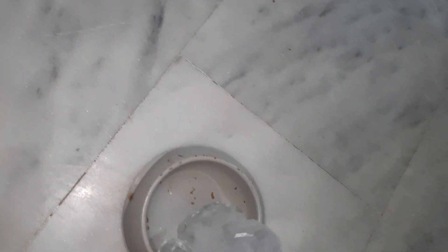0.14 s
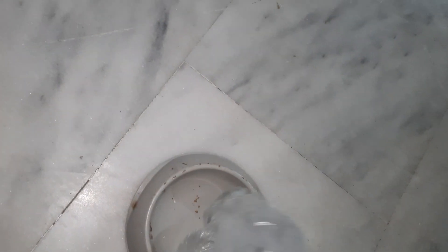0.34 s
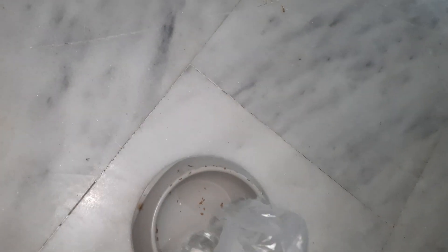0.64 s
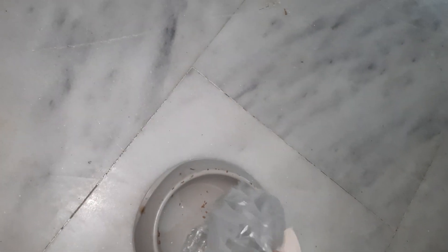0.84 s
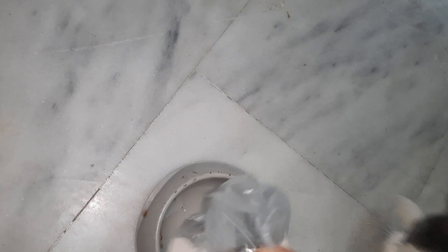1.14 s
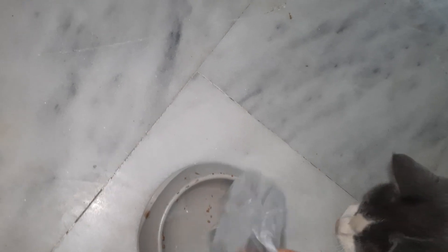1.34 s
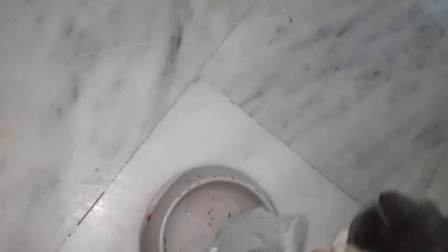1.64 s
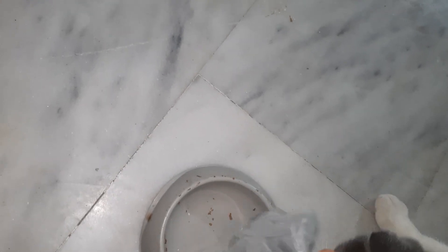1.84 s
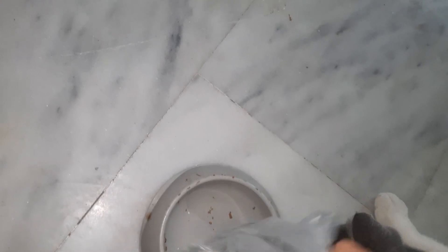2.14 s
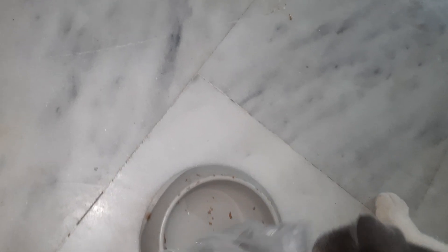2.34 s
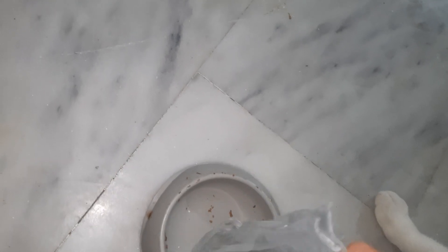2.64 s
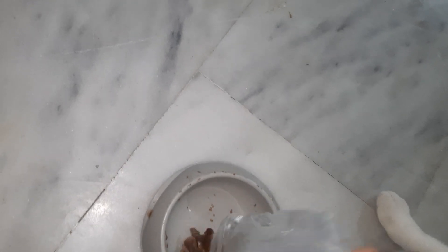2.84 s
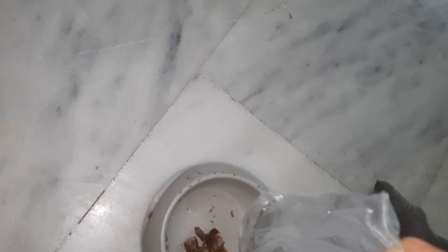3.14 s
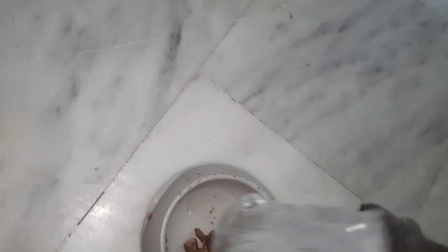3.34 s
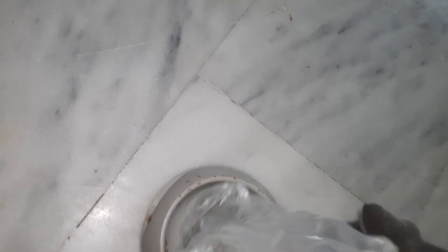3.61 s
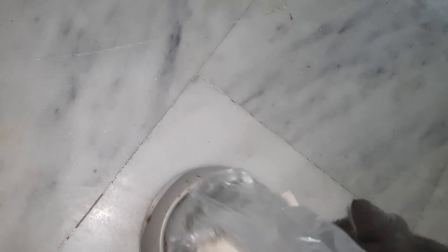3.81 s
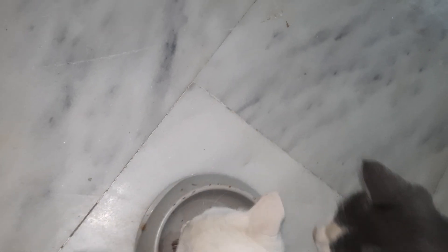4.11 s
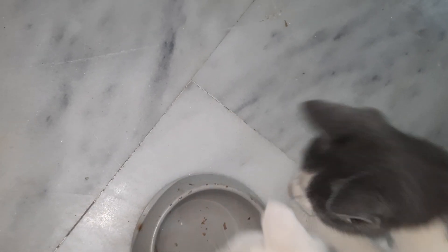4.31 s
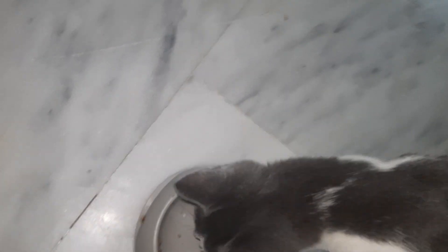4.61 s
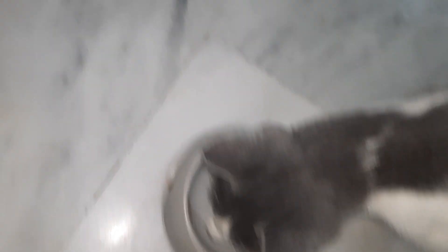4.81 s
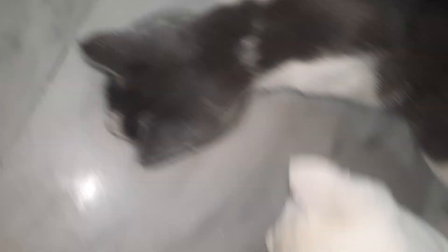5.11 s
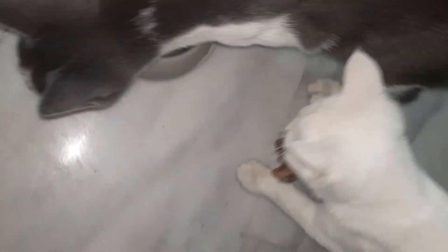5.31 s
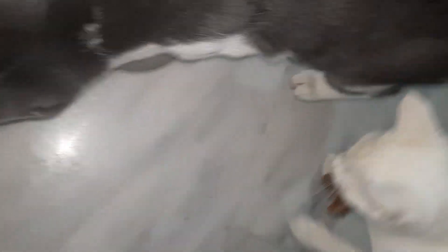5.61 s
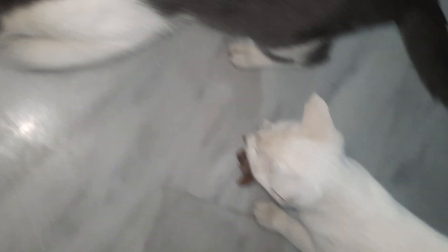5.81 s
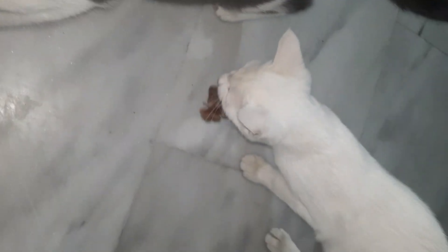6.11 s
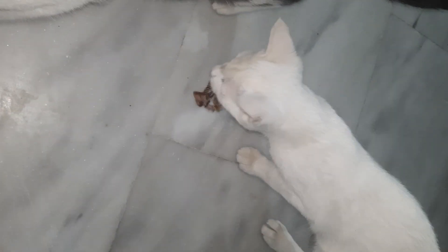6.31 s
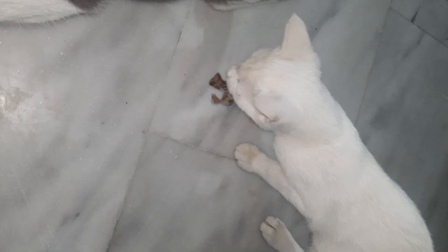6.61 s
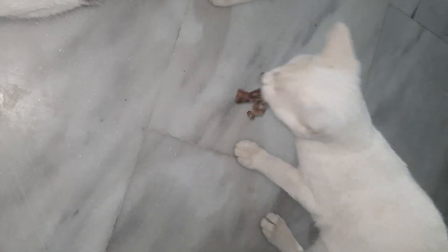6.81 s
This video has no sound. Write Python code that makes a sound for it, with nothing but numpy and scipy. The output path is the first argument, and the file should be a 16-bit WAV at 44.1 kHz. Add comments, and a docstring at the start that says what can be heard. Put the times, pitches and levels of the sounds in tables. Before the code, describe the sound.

Close crackling of a plastic bag and two bowl knocks, followed by a cat's low, continuous growl with faint wet bites.

```python
"""A cat growls over its food

A thin plastic bag is shaken out close by, over a food bowl on a stone floor: its creases crackle,
the sheet flaps and the bowl knocks. A cat snatches a piece and growls over it in one long low rattle,
its vocal folds thumping the throat and puffing air through the mouth. It chews as it growls,
while the bag is crumpled away to the left."""
import sys
import numpy as np
from scipy import signal
from scipy.fft import rfft, irfft
from scipy.io import wavfile
from scipy.ndimage import uniform_filter1d

SR = 44100
rng = np.random.default_rng(int(sys.argv[2]) if len(sys.argv) > 2 else 0)


def master(y):
    """Save y as 16-bit WAV."""
    cut = np.clip(np.atleast_2d(y).T, -1, 1)
    pcm = np.round(cut * 32767)  # scale
    wavfile.write(sys.argv[1], SR, pcm.astype(np.int16))


N = 306495
TIME = np.arange(N) / SR

# how hard the cat growls: t/s, level/dB
EFFORT = [(4.15, -54.5), (4.24, -41.5), (4.42, -43), (4.53, -41.5), (4.73, -40), (4.8, -38), (5.1, -38),
          (5.16, -39.5), (5.33, -35.5), (5.57, -37.5), (5.77, -38.5), (5.86, -42.5), (6.07, -40.5),
          (6.28, -45.5), (6.47, -43.5), (6.68, -40.5), (6.95, -47)]
# tone of the throat with the mouth nearly shut: f/Hz, level/dB
THROAT_TONE = [(30, -62), (65, -6), (105, 1), (140, 6), (205, 7.5), (285, 8.5), (345, 11), (400, -6),
               (490, -1.5), (570, -7), (780, -17), (950, -50), (3000, -72)]
# the mouth's lowest resonance: t/s, f/Hz, level/dB relative to the effort
MOUTH_RING = [(4.25, 650, -8), (4.4, 574, -12.5), (4.6, 616, -16), (5.05, 660, -22), (5.35, 640, -16),
              (5.68, 610, -19), (5.76, 550, -19.5), (5.85, 600, -23), (6.06, 660, -16), (6.45, 593, -18),
              (6.68, 626, -13), (6.9, 600, -20.5)]
# rasping resonances above it: f/Hz, width/Hz, level/dB
RASP_RINGS = [(1050, 225, 10.5), (1487, 160, 6.5)]
# how much rasp is in the growl: t/s, level/dB
SNARL = [(4.16, -2), (4.32, -42), (5.05, -46), (5.4, -36), (5.76, -33), (5.86, -20), (6.12, -19),
         (6.3, -16), (6.6, -26.5), (6.85, -17)]

def growl(puff_s=0.0076, mouth_width_hz=220, jaw_rest_hz=630, press_above_db=-43.5):
    """Each beat of the vocal folds thumps the throat and lets a puff of air through the mouth."""
    gape, clench = chewing()
    closures, beats = vocal_folds(gape + clench)
    (effort_db,), (mouth_hz, mouth_db), (rasp_db,) = curves(EFFORT), curves(MOUTH_RING), curves(SNARL)
    # an open jaw trades the low resonance for higher, louder rasp; a clench muffles everything
    effort_db = effort_db - clench
    mouth_db = mouth_db - gape - 30 * clench
    rasp_db = rasp_db - 2 + 5 * gape - 5.5 * clench
    jaw = (mouth_hz / jaw_rest_hz) ** 0.35 + 0.086 * gape
    airflow = evened(signal.lfilter([1], [1, -np.exp(-1 / (puff_s * SR))], beats))
    puffs = evened((airflow + 0.41) * rng.standard_normal(N))
    thumps = -evened(closures)  # each closure is a drop in pressure
    throat = colour(thumps + .2 * puffs, THROAT_TONE)
    # harder effort lifts the upper edge of the throat's tone
    press = gain_of(1.56 * (effort_db - press_above_db)) - 1
    chest = steadied(throat + press * resonate(throat, hz=482, width_hz=83))
    mouth = steadied(resonate_twice(thumps + .5 * puffs, mouth_hz, mouth_width_hz)) * gain_of(mouth_db)
    breath = .5 * thumps + puffs
    rings = sum(gain_of(db) * resonate_twice(breath, hz * jaw, width) for hz, width, db in RASP_RINGS)
    rasp = steadied(rings) * gain_of(rasp_db)
    fade_in = np.clip((TIME - EFFORT[0][0]) / 0.018, 0, 1)
    return (gain_of(effort_db) * (chest - mouth + rasp) + teeth(puffs)) * fade_in


# how fast the vocal folds beat: t/s, f/Hz
GROWL_PITCH = [(4.15, 147), (4.35, 131.5), (4.53, 140), (4.65, 132.5), (4.74, 137.5), (4.8, 147.5),
               (4.97, 142), (5.06, 145), (5.15, 138.5), (5.32, 147.5), (5.57, 144), (5.67, 148.5),
               (5.78, 146), (5.87, 137), (6.04, 144), (6.24, 136), (6.47, 133.5), (6.55, 142),
               (6.68, 147.5), (6.95, 134)]
# unevenness of the beats: t/s, roughness/0-1, flutter's lag behind half the beat rate/Hz, flutter depth
ROUGHNESS = [(4.15, .6, 0, .9), (4.3, .3, 0, 1.05), (4.72, .35, 1, 1.1), (4.8, .55, 6, .6),
             (5.75, .7, 9, .6), (5.92, .75, 11, .85), (6.42, .7, 3, .9), (6.62, .75, 10, .7)]

def vocal_folds(chew, jitter_s=.00034, shimmer_db=1.7, tremble=.024):
    """The folds beat unevenly under a slower flutter; returns their closures and each beat's strength."""
    (hz,), (rough, lag_hz, depth) = curves(GROWL_PITCH), curves(ROUGHNESS)
    rough = rough + 0.2 * chew
    tremor = wobble(hz=13, width_hz=9)
    stray, swell = wobble(hz=18, width_hz=18), wobble(hz=18, width_hz=18)
    cycles = np.cumsum(hz * (1 + tremble * rough * tremor)) / SR
    due = np.flatnonzero(np.diff(np.floor(cycles)))  # one beat per cycle
    early, strong = (rng.standard_normal((N, 2))[:len(due)] * rough[due, None]).T
    beat_at = np.clip((due - SR * jitter_s * early).astype(int), 0, N - 1)
    beats = np.zeros(N)
    beats[beat_at] = gain_of(shimmer_db * strong)
    # the flutter swells and hurries the beats, adding a tone above each harmonic
    unsteady = .6 * rough * uniform_filter1d(.5 * swell + 1j * stray, size=300)
    flutter_cycles = cycles / 2 - np.cumsum(lag_hz) / SR
    flutter = 1 + depth * np.exp(2j * np.pi * flutter_cycles + unsteady)
    return (signal.hilbert(beats) * flutter).real, beats * abs(flutter)


# air past the teeth: t/s, lower resonance f/Hz, lower level/dB, upper level/dB
TEETH_HISS = [(4.25, 2580, -71, -84), (5.1, 2630, -68.5, -85), (5.17, 1560, -82, -84),
              (5.39, 1600, -63.5, -77), (5.8, 1570, -80, -88), (5.89, 1710, -83, -71),
              (5.97, 1620, -72, -89), (6.1, 1800, -71, -73), (6.15, 2380, -70, -73),
              (6.205, 2590, -75, -65), (6.31, 2190, -82, -89), (6.42, 2320, -69, -63.5),
              (6.49, 2220, -81, -77), (6.57, 1620, -72.5, -79), (6.72, 1590, -73, -74),
              (6.83, 2220, -91, -73), (6.93, 2430, -70.5, -78)]

def teeth(puffs, whistle_hz=6250, rest_hz=2330):
    """Air and spittle ring two narrow resonances behind the teeth; the upper sinks as the lower rises."""
    low_hz, low_db, high_db = curves(TEETH_HISS)
    high_hz = whistle_hz - 1.3 * (low_hz - rest_hz)
    low = steadied(resonate_twice(puffs, low_hz, width_hz=340))
    spittle = crackle(per_s=1200, spread_db=3) * np.sqrt(abs(puffs))
    high = steadied(resonate_twice(spittle, high_hz, width_hz=560))
    return low * gain_of(low_db) + high * gain_of(high_db)


# chews: widest opening t/s, half length/s, opening/0-1, clench/0-1
JAW_MOVES = [(5.9, 0.047, 0.5, 0.5), (6.154, 0.083, 0.8, 0.94), (6.413, 0.064, 1, 0.3),
             (6.93, 0.03, 0.45, 0.49)]

def chewing(lag=1.35):
    """The jaw gapes, then clenches `lag` half lengths later; returns both moves as curves."""
    gape = sum(wide * np.exp(-((TIME - s) / half) ** 2) for s, half, wide, _ in JAW_MOVES)
    clench = sum(hard * np.exp(-(2 * ((TIME - s) / half - lag)) ** 2) for s, half, _, hard in JAW_MOVES)
    return gape, clench


# bites: t/s, level/dB, length/s, ring of the mouth f/Hz, splash level/dB relative to the ring
WET_BITES = [(4.498, -52, 0.015, 2770, 7), (5.905, -49.5, 0.0081, 5750, 2.5),
             (5.932, -58, 0.0064, 4000, 6.5), (6.144, -50, 0.008, 1493, -15),
             (6.202, -58, 0.017, 2540, 12.5), (6.91, -54.5, 0.019, 1490, -1)]
# tone of the wet splash: f/Hz, level/dB
SPLASH_TONE = [(400, -34), (1000, -3), (1500, 5), (2100, -8), (2700, 2), (3400, -9), (5000, -7),
               (6000, -0.5), (10000, -15)]

def bites(level_db=-5):
    """Each bite is a short cluster of wet crackles that rings the mouth at its own pitch."""
    t, out = np.arange(SR // 8) / SR, np.zeros(N)
    for s, db, length, hz, splash_db in WET_BITES:
        clicks = crackle(per_s=5500, spread_db=4)[:len(t)]
        ring = steadied(resonate_twice(clicks, hz, width_hz=600), size=300)
        splash = gain_of(splash_db) * steadied(colour(clicks, SPLASH_TONE), size=300)
        shape = np.exp(-t / length) * (1 - np.exp(-12 * t / length))
        add(out, s - .001, gain_of(db + level_db) * shape * (ring + splash))
    return out


def saliva(level_db=-74):
    """Tiny wet ticks as the lips part, with the same bright tone as the bag's creases."""
    clicks = np.diff(crackle(per_s=130, spread_db=3), prepend=0)
    gape, _ = chewing()
    return gain_of(level_db) * evened(colour(clicks, CREASE_TONE)) * np.sqrt(gape)


# how far left the cat sounds: f/Hz, left minus right/dB
CAT_PAN = [(290, 9.5), (350, 11.5), (440, 17), (495, 10), (535, -6), (600, 0), (710, 2), (800, 9),
           (1150, 14), (2400, 7.5), (8000, 9)]
# how far the right channel runs ahead: f/Hz, phase/radians
RIGHT_LEAD = [(360, .2), (450, 1.3), (520, 2.8), (550, .2)]

def cat():
    """Growl and chewing come from the left."""
    hz = np.fft.rfftfreq(N, 1 / SR)
    lead = np.exp(1j * np.outer([0, 1], value_at(RIGHT_LEAD, hz)))
    voice = growl() + bites() + saliva()
    return irfft(rfft(voice) * pan(value_at(CAT_PAN, hz)) * lead, N)


# the bag gripped and crumpled: t/s, length/s, crinkle level/dB, flap offset/dB
BAG_CRUMPLES = [(-.02, 0.28, -55.5, -10), (0.31, 0.17, -63, -11), (0.523, 0.42, -60, -6.5),
                (0.989, 0.097, -61, -11.5), (1.11, 0.33, -53.5, -8.5), (1.452, 1.48, -56.5, -8),
                (2.963, 0.16, -71.5, -5.5), (3.188, 0.33, -64, -9), (3.5, 0.12, -62, -10),
                (3.747, 0.22, -52, -11), (3.98, 0.53, -60.5, -1.5), (4.405, 0.44, -53.5, -12.5),
                (4.904, 0.091, -60.5, -12), (5.021, 0.45, -58.5, -2.5), (5.475, 0.32, -64.5, -9.5),
                (5.82, 0.16, -70, 3), (6.064, 0.14, -70, -15), (6.61, 0.081, -65.5, -20)]
# shakes and tugs: t/s, crinkle level/dB, half length/s, flap offset/dB
BAG_SHAKES = [(0.728, -57.5, 0.032, -14), (0.903, -58.5, 0.023, -7.5), (1.563, -51, 0.036, -10),
              (1.73, -51.5, 0.02, -11), (1.918, -50, 0.032, -16), (2.074, -50, 0.025, -11),
              (2.245, -48, 0.027, -12.5), (2.41, -44.5, 0.019, -16), (2.593, -45.5, 0.025, -13.5),
              (2.778, -44.5, 0.024, -12), (4.21, -47.5, 0.075, -14.5), (4.773, -50, 0.018, -16),
              (5.075, -44.5, 0.032, -35), (5.428, -52, 0.039, -13)]

def handling(grip_s=0.027, relax_s=0.041, firm_db=-45, flap_above_db=-54.5):
    """Crumples hold steady, shakes swell and fade; returns how strongly the bag crinkles and flaps."""
    moves = []
    for s, length, db, flap_db in BAG_CRUMPLES:
        slow = gain_of(0.15 * (firm_db - db))  # gentler crumples start and end more slowly
        grip = np.clip((TIME - s) / (grip_s * slow), 0, 1)
        relax = np.exp(-np.maximum(TIME - s - length, 0) / (relax_s * slow))
        moves.append((gain_of(db) * grip * relax, flap_db))
    for s, db, half, flap_db in BAG_SHAKES:
        moves.append((gain_of(db) / np.sqrt(1 + ((TIME - s) / half) ** 4), flap_db))
    crinkle = np.sqrt(sum(move ** 2 for move, _ in moves))
    flap = np.sqrt(sum((move * gain_of(flap_db)) ** 2 for move, flap_db in moves))
    return crinkle, flap * (crinkle / gain_of(flap_above_db)) ** 0.61


def plastic(tone, per_s, spread_db, clump_db):
    """Creases buckle in clumps; their clicks reach left and right by different scattered paths."""
    clumps = gain_of(clump_db * evened(uniform_filter1d(rng.standard_normal(N), 330)))
    out = np.zeros((2, N))
    for _ in range(6):
        paths = rng.standard_normal((2, 256)) * np.exp(-np.arange(256) / SR / 0.0012)
        clicks = crackle(per_s / 6, spread_db) * clumps
        out += signal.oaconvolve(clicks[None], evened(paths), axes=1)[:, :N]
    return np.array([steadied(colour(side, tone)) for side in refolded(out)])


def refolded(x, depth_db=2.2):
    """As the bag's folds change shape, patches of its tone swell and fade."""
    spectrum = signal.stft(x, nperseg=256)[2]
    patches = rng.standard_normal(spectrum.shape[1:])
    for _ in range(2):
        patches = uniform_filter1d(uniform_filter1d(patches, size=7, axis=0), size=16, axis=1)
    return signal.istft(spectrum * gain_of(depth_db * evened(patches)), nperseg=256)[1][:, :N]


# tones of the fine creases and of the flapping sheet: f/Hz, level/dB
CREASE_TONE = [(1500, -26.5), (3000, -17), (3900, -4), (4700, -6.5), (5800, 0), (7000, 1), (8500, -1.5),
               (9500, -7.5), (10600, -4.5), (12000, 1), (13300, 2), (14400, 1.5), (15800, -4.5)]
SHEET_TONE = [(100, -38), (320, 0), (500, -15.5), (800, -2), (1250, -1.5), (1600, 4.5), (2100, -3),
              (2750, 0), (4100, -1.5), (7000, -7.5), (15000, -35)]
# how the bag's tone differs between the sides: f/Hz, left minus right/dB
BAG_PAN = [(450, 4.5), (1100, 16.5), (3300, -1), (5500, 5), (8500, -1), (13000, -3)]
# the bag's move to the left: t/s, left minus right/dB
BAG_PATH = [(0, 2.5), (2.8, 3.5), (3.7, 2.5), (4.5, 6.5), (6.95, 17)]

def bag(level_db=2):
    """The creases crinkle finely; the whole sheet flaps more as it is shaken harder."""
    crinkle, flap = handling()
    creases = crinkle * plastic(CREASE_TONE, per_s=5000, spread_db=2.5, clump_db=1.5)
    sheet = flap * plastic(SHEET_TONE, per_s=4000, spread_db=1.5, clump_db=1.1)
    sides = pan(value_at(BAG_PAN, np.fft.rfftfreq(N, 1 / SR)))
    rustle = irfft(rfft(creases + sheet) * sides, N)
    return gain_of(level_db) * rustle * pan(curves(BAG_PATH)[0])


# single creases snapping: t/s, level/dB
CREASE_SNAPS = [(0.1082, -30.5), (1.975, -38), (2.4014, -34), (2.7487, -33), (2.7954, -30), (3.481, -34.5),
                (3.4955, -38), (3.9364, -36)]

def snaps(level_db=1.5):
    """A stiff crease flips over with one sharp, bright tick and a brief shiver."""
    t, out = np.arange(600) / SR, np.zeros((2, N))
    for s, db in CREASE_SNAPS:
        for side in out:
            flip = (t == 0) + .25 * rng.standard_normal(len(t)) * np.exp(-t / .001)
            tick = colour(np.diff(flip, prepend=0), CREASE_TONE)
            add(side, s, gain_of(db + level_db) * tick / abs(tick).max())
    return out * pan(left_db=2)


# food and bowl knocking: t/s, level/dB
BOWL_KNOCKS = [(2.78, -39.5), (2.792, -47), (4.116, -40.5), (4.124, -53)]
# the notes the bowl rings at: f/Hz, level/dB, time to fade by 60 dB/s
BOWL_NOTES = [(660, -6.5, 0.081), (860, 7.5, 0.044), (994, 8, 0.054), (1290, 4, 0.042), (1530, 11.5, 0.03),
              (1720, 9.5, 0.028)]

def bowl(attack_s=0.00098):
    """The bowl knocks on the stone with a short, dead ring."""
    t, out = np.arange(SR // 8) / SR, np.zeros(N)
    for s, db in BOWL_KNOCKS:
        ring = sum(gain_of(note_db - 60 * t / fade_s) * np.sin(2 * np.pi * (hz * t + rng.random()))
                   for hz, note_db, fade_s in BOWL_NOTES)
        add(out, s, gain_of(db) * np.minimum(t / attack_s, 1) * ring / np.std(ring[:132]))
    return out * pan(left_db=7)


# how long the room rings: f/Hz, time to fade by 60 dB/s
ECHO_FADE = [(150, 0.83), (1000, 0.16), (5000, 0.0081), (15000, 0.0077)]

def room(x):
    """Bare walls add a short echo whose treble dies first."""
    hz, t, noise = signal.stft(rng.standard_normal((2, SR // 2)), SR, nperseg=256)
    fade = gain_of(-60 * t / value_at(ECHO_FADE, hz)[:, None]) * (t > .006)
    tail = signal.istft(noise * fade, SR, nperseg=256)[1]
    return signal.fftconvolve(x.mean(0)[None], tail / np.linalg.norm(tail[0]), axes=1)[:, :N]


# tones of the quiet room and of the rumble: f/Hz, level/dB
AIR_TONE = [(25, -51), (43, -26), (113, 0.5), (152, -4.5), (313, -12.5), (2120, -23.5), (13500, -23),
            (15500, -63)]
RUMBLE_TONE = [(20, -37), (45, -8), (65, -3.5), (110, -12.5), (200, -18), (400, -19.5), (1000, -46.5)]
# how loud the rumble is: t/s, level/dB
RUMBLE_LEVEL = [(0, -77.5), (2.7, -71.5), (3.1, -75), (3.9, -74.5), (4.3, -67), (6.1, -63.5), (6.37, -60.5),
                (6.55, -60)]

def background(air_db=-73.5, stereo_width=0.23):
    """Still room air and a low rumble of movement."""
    air = np.array([evened(colour(noise, AIR_TONE)) for noise in rng.standard_normal((2, N))])
    left, right, both = (evened(colour(noise, RUMBLE_TONE)) for noise in rng.standard_normal((3, N)))
    rumble = evened(both + stereo_width * np.array([left, right])) * gain_of(curves(RUMBLE_LEVEL)[0])
    return gain_of(air_db) * air * pan(left_db=1.6) + rumble * pan(left_db=7.8)


def gain_of(db):
    """Turns decibels into a multiplier."""
    return 10 ** (np.asarray(db) / 20)


def evened(x):
    """Brings the overall level to 1."""
    return x / np.sqrt(np.mean(x ** 2) + 1e-20)


def steadied(x, size=2600):
    """Brings the running level to 1 and keeps the fast detail."""
    return x / np.sqrt(abs(uniform_filter1d(uniform_filter1d(x ** 2, size), size)) + 1e-12)


def value_at(points, hz):
    """Looks up a table by frequency, sliding between its rows."""
    f, value = np.transpose(points)
    return np.interp(np.log(hz + 1), np.log(f + 1), value)


def curves(rows):
    """Turns a table that starts with times into one curve for each other column."""
    s, *columns = np.transpose(rows)
    return [np.interp(TIME, s, column) for column in columns]


def add(mix, s, sound):
    """Mixes a sound in at s seconds."""
    part = mix[max(round(s * SR), 0):][:len(sound)]
    part += sound[:len(part)]


def colour(x, tone, size=4096):
    """Filters a sound to the given tone, with no ringing ahead of a click."""
    log_gain = np.log(gain_of(value_at(tone, abs(np.fft.fftfreq(size, 1 / SR)))))
    taps = np.fft.ifft(np.exp(np.conj(signal.hilbert(log_gain)))).real
    return signal.oaconvolve(x, taps)[:len(x)]


def resonate(x, hz, width_hz):
    """A resonance: keeps the sound near one frequency, which may glide."""
    turn = np.exp(2j * np.pi * np.cumsum(hz * np.ones(len(x))) / SR)
    decay = np.exp(-np.pi * width_hz / SR)
    return 2 * (turn * signal.lfilter([1 - decay], [1, -decay], x / turn + 1e-18)).real


def resonate_twice(x, hz, width_hz):
    """A resonance with steeper sides."""
    return resonate(resonate(x, hz, width_hz), hz, width_hz)


def wobble(hz, width_hz):
    """A random sway at roughly the given rate."""
    return steadied(resonate(rng.standard_normal(N), hz, width_hz), size=12000)


def crackle(per_s, spread_db):
    """Random clicks, most small and a few large."""
    size = gain_of(spread_db * np.minimum(rng.exponential(1, N), 5))
    return size * rng.choice([-1., 1.], N) * (rng.random(N) < per_s / SR)


def pan(left_db):
    """Left and right gains that average 1, the left louder by left_db."""
    ratio = gain_of(np.atleast_1d(left_db))
    return 2 * np.array([ratio, np.ones_like(ratio)]) / (1 + ratio)


def scene(cat_echo_db=-25, things_echo_db=-16):
    """Cat, bag and bowl close by, with a little of the room."""
    voice, things = cat(), bag() + snaps() + bowl()
    echo = room(gain_of(cat_echo_db) * voice + gain_of(things_echo_db) * things)
    return voice + things + echo + background()


def record(dry, top_hz=16000):
    """Cuts off the very highest treble."""
    low_pass = signal.firwin(511, top_hz, window=("kaiser", 9), fs=SR)
    return signal.oaconvolve(dry, low_pass[None], "same")


dry = scene()
out = record(dry)
master(out)
```